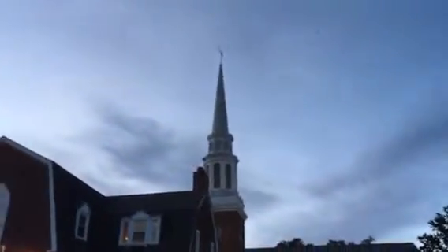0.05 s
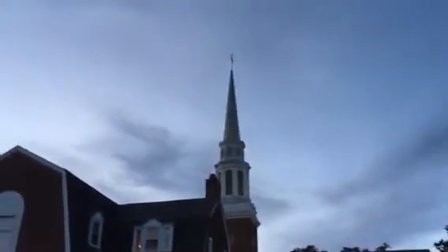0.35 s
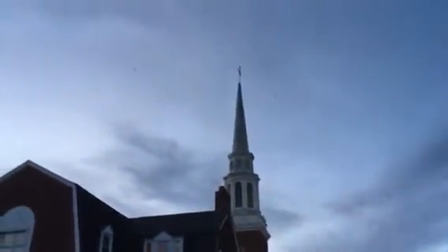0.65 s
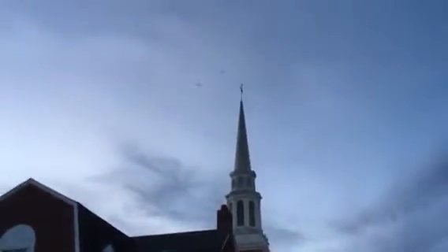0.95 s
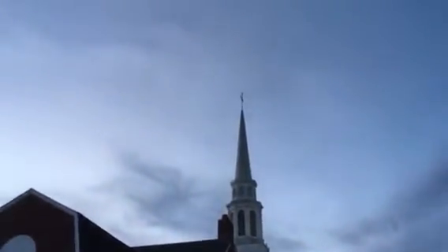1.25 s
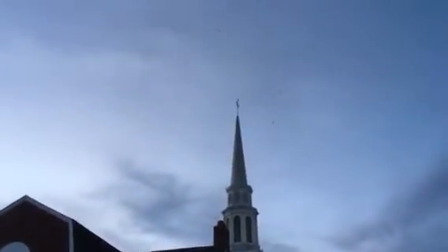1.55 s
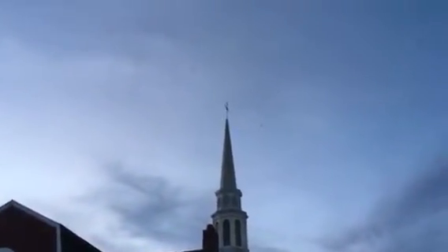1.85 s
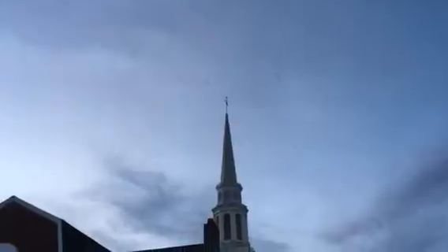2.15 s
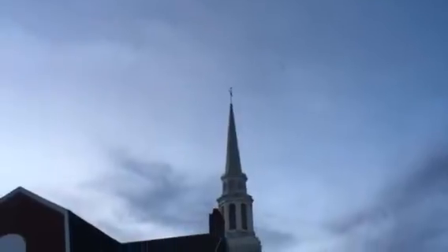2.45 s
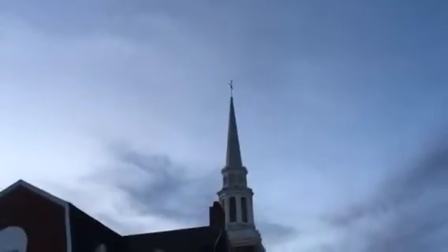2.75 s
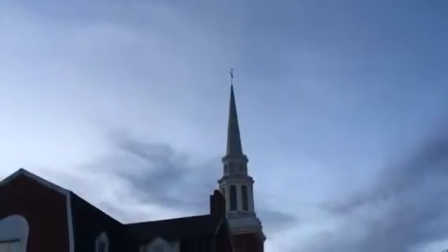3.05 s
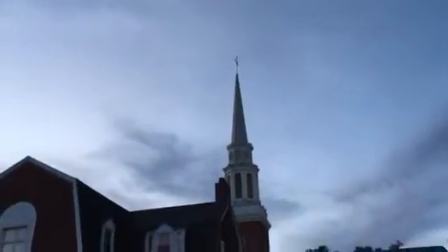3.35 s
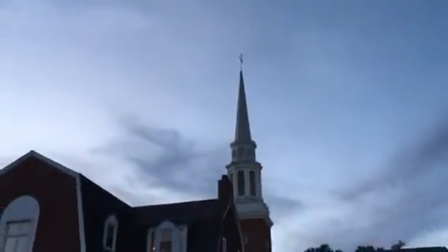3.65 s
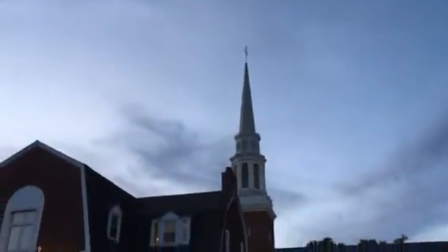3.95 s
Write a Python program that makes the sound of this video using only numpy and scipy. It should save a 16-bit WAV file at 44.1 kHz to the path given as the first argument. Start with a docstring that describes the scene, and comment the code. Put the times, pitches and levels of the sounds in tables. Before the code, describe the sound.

Small birds chip sharply in short bursts outdoors, loudest midway and then a little weaker. Underneath, distant engines drone and rumble, with faint rhythmic insect chirps and thin far trills, as a distant car gradually draws nearer.

```python
"""Swifts over a street at dusk

Swifts give runs of short, falling chips that echo off a wall. Behind them an insect chirps
in a steady rhythm of wing strokes, and thin distant trills come and go. Engines drone under
the low traffic rumble, and the tyre noise of a far car slowly swells."""
import sys
import numpy as np
from scipy import signal
from scipy.fft import rfft, irfft
from scipy.io import wavfile

SR = 44100
rng = np.random.default_rng(int(sys.argv[2]) if len(sys.argv) > 2 else 0)


def wav_record(signal):
    """Record a signal, one row per channel, as 16-bit PCM in the file named by sys.argv[1]."""
    frames = np.transpose(np.atleast_2d(signal))
    bounded = np.clip(frames, -1, 1)
    # unit amplitude maps onto the largest positive 16-bit level
    quanta = np.round(bounded * 32767).astype(np.int16)
    wavfile.write(sys.argv[1], SR, quanta)


N = 176400
T = np.arange(N) / SR


def from_db(db):
    """Decibels to gain."""
    return 10 ** (np.asarray(db) / 20)


def rms_one(x):
    """Scale to rms 1."""
    return x / np.sqrt(np.mean(x ** 2) + 1e-20)


def in_time(rows):
    """Each column after t/s, interpolated to every sample."""
    t_s, *columns = np.transpose(rows)
    return [np.interp(T, t_s, column) for column in columns]


def coloured(spectrum, low_hz=15, high_hz=20000):
    """Noise shaped by (f/Hz, level/dB) points between two band edges; rms 1."""
    hz = np.arange(N // 2 + 1) * SR / N + 1e-3
    point_hz, point_db = np.transpose(spectrum)
    shape = from_db(np.interp(np.log(hz), np.log(point_hz), point_db))
    edges = 1 / np.sqrt((1 + (low_hz / hz) ** 10) * (1 + (hz / high_hz) ** 10))
    return rms_one(irfft(rfft(rng.standard_normal(N)) * edges * shape, N))


def narrow(hz, width_hz):
    """Noise twice through one resonance; rms 1."""
    r = np.exp(-np.pi * width_hz / SR)
    section = [1 - r, 0, r - 1, 1, -2 * r * np.cos(2 * np.pi * hz / SR), r * r]
    return rms_one(signal.sosfilt([section, section], rng.standard_normal(N + SR))[SR:])


def drift(rate_hz):
    """Random wander: straight lines between unit normal draws."""
    return np.interp(T * rate_hz, np.arange(500), rng.standard_normal(500))


def swell(start_s, length_s, edge_s):
    """Rise, hold, fall; ramps centred on start and end."""
    return np.clip(np.minimum(T - start_s, start_s + length_s - T) / edge_s + .5, 0, 1)


def air():
    """Steady hiss of still air and microphone."""
    spectrum = [(1500, -4.5), (3500, 9.5), (4800, 2.5), (5800, 7), (6600, 5.5), (7400, 0.5), (9500, 1),
                (10400, -1.5), (11500, 0), (13500, -1.5), (16000, -5)]  # f/Hz, relative density/dB
    return from_db(-66.5) * coloured(spectrum, low_hz=1500)


def faint_hiss():
    """Broad band high above the tyre roar, rising at the end."""
    levels = [(0, -80), (3.5, -89), (3.9, -70), (4, -69)]  # t/s, level/dB
    return from_db(in_time(levels)[0]) * narrow(4260, width_hz=900)


def rumble():
    """Low traffic noise, gently heaving."""
    spectrum = [(20, -30), (30, -21), (42, -12), (55, -0.5), (80, 0.5), (105, 1), (140, -7.5), (200, -10),
                (300, -18), (450, -25.5), (700, -29.5), (1500, -54)]  # f/Hz, relative density/dB
    levels = [(0, -46.5), (.3, -43), (.6, -46.5), (1.2, -44.5), (1.8, -45.5), (2.4, -44), (3.0, -44.5),
              (4, -44)]  # t/s, level/dB
    return from_db(in_time(levels)[0]) * coloured(spectrum, high_hz=1480)


def engine(curve, gain_db):
    """Low exhaust note with two weak overtones, each wavering in level."""
    orders = [(1, -0.5), (2, -16.5), (3, -28.5)]  # harmonic number, relative level/dB
    waver_db = 3
    hz, db = in_time(curve)
    phase = 2 * np.pi * (np.cumsum(hz) / SR + rng.random())
    out = np.zeros(N)
    for order, order_db in orders:
        level_db = db + gain_db + order_db + waver_db * drift(rate_hz=7.68)
        out += from_db(level_db) * np.sin(order * phase)
    return np.sqrt(2) * out


def engines():
    """Three drones: near engine, far engine, approaching car."""
    # exhaust notes: t/s, f/Hz, relative level/dB
    near = [(0, 61.3, -40.5), (.58, 61.4, -47), (.75, 62.3, -38.5), (1.35, 64.03, -42), (2.05, 65.24, -44),
            (2.25, 65.94, -53), (3.2, 66, -45.5), (4, 63, -59.5)]
    far = [(0, 45.32, -50.5), (.8, 43, -43.5), (1.5, 41.07, -52), (2.8, 40.64, -46), (3.2, 40.5, -56),
           (4, 40, -58)]
    car = [(0, 156, -76), (1.7, 161, -72), (2.2, 163.7, -54), (3.0, 163.7, -52), (3.6, 165.7, -50),
           (4, 167.4, -55)]
    return engine(near, gain_db=-1) + engine(far, gain_db=-1) + engine(car, gain_db=-4.5)


def tyres():
    """Road roar, tread resonance and a brighter hiss, each with its own swell."""
    # spectra: f/Hz, relative density/dB
    roar_spectrum = [(200, -16), (400, -7.5), (620, -7), (800, -2.5), (1000, -2), (1200, -1.5), (1550, 0.5),
                     (1900, -1.5), (3000, -10)]
    hiss_spectrum = [(1300, -13), (1800, 0.5), (2200, 1), (2600, -2.5), (3000, -7), (3600, -18),
                     (4500, -23.5), (6000, -42)]
    levels = [(0, -59.5, -66.5, -70), (.65, -59.5, -65, -68.5), (1.15, -56.5, -64.5, -66),
              (1.45, -57.5, -64.5, -71), (2.15, -55, -62, -68), (2.45, -54.5, -57.5, -68),
              (2.7, -53.5, -59, -69), (2.97, -53, -59.5, -60.5), (3.45, -50.5, -60, -56.5),
              (3.7, -51, -58, -64), (4, -52.5, -56, -61.5)]  # t/s, relative levels: roar/dB, hiss/dB, tread/dB
    roar_db, hiss_db, tread_db = in_time(levels)
    roar = from_db(roar_db) * coloured(roar_spectrum, low_hz=176, high_hz=1900)
    tread = from_db(tread_db) * narrow(967, width_hz=78)
    hiss = from_db(hiss_db) * coloured(hiss_spectrum, low_hz=1600)
    return from_db(1) * (roar + tread + hiss)


def trills():
    """High, level trills, blurred by distance into narrow fluttering bands that linger."""
    calls = [(-.03, 0.099, 4500, -69), (.06, .10, 4650, -70), (0.236, .06, 6080, -70.5),
             (.745, .035, 5070, -69), (0.806, 0.14, 5230, -70), (1.277, 0.16, 4730, -71),
             (1.72, 0.38, 4570, -73.5), (2.982, .18, 4760, -75), (3.14, 0.2, 5168, -69),
             (3.431, 0.16, 5180, -75), (3.48, .28, 4550, -74)]  # t/s, length/s, f/Hz, level/dB
    tail_s = .05
    pole = np.exp(-1 / (tail_s * SR))
    out = np.zeros(N)
    for start_s, length_s, hz, db in calls:
        gate = swell(start_s, length_s, edge_s=.04)
        tail = np.sqrt(signal.lfilter([1 - pole], [1, -pole], gate ** 2 + 1e-18))
        core = narrow(hz, width_hz=150)
        blur = from_db(-4) * narrow(hz, width_hz=520)
        out += from_db(db) * np.maximum(gate, tail) * rms_one(core + blur)
    return out


def insect():
    """Chirps of about four wing strokes, each sagging in pitch, over a steady far chorus."""
    chirps = [(.315, 0.13, -67), (.79, 0.13, -67), (1.239, 0.1, -66.5), (1.596, 0.12, -66.5),
              (1.974, .135, -67.5), (2.428, 0.13, -67), (2.851, 0.12, -67.5)]  # t/s, length/s, relative level/dB
    pitch_hz, jitter_hz, sag_hz, strokes_per_s = 6435, 24.8, 110, 34
    direct, scatter_gain = np.zeros(N), np.zeros(N)
    for start_s, length_s, db in chirps:
        stroke = ((T - start_s) * strokes_per_s) % 1
        hz = pitch_hz + jitter_hz * drift(rate_hz=40) - sag_hz * (stroke - .5)
        tone = np.sin(2 * np.pi * np.cumsum(hz) / SR)
        growth = np.clip(.5 + (T - start_s) / length_s, 0, 1)
        envelope = swell(start_s, length_s, edge_s=.02) * growth * np.sin(np.pi * stroke) ** 2
        direct += 1.7 * from_db(db) * envelope * tone
        scatter_gain += from_db(db - 7) * swell(start_s, length_s, edge_s=.05)
    scatter = scatter_gain * narrow(6290, width_hz=240)
    chorus = from_db(-75.5) * narrow(6270, width_hz=280)
    return direct + scatter + chorus


def street(x):
    """Direct sound plus one wall echo and a faint scattered tail."""
    echo_s, echo_db, t60_s, tail_db = .012, -19, .32, -9.5
    echo = np.interp(T - echo_s, T, x)
    t = T[:SR // 2]
    tail = rng.standard_normal(len(t)) * from_db(-60 * t / t60_s) * (t > echo_s)
    scattered = signal.fftconvolve(x, tail / np.sqrt(np.sum(tail ** 2)))[:N]
    return x + from_db(echo_db) * echo + from_db(tail_db) * scattered


def swifts():
    """Each chip is a sine plus octave that starts sharply, then dives and fades."""
    # t/s, dive time/s, start f/Hz, share of pitch lost in the dive time, level/dB
    chips = [(0.067, 0.024, 4880, 0.14, -60), (.1315, 0.029, 5150, 0.14, -57),
             (1.1105, 0.0043, 6309, .24, -53), (1.159, 0.0069, 6352, .28, -52),
             (1.212, 0.0091, 5900, .12, -52.5), (1.26, .007, 5770, .28, -51.5),
             (1.341, 0.012, 5670, .12, -51.5), (1.407, 0.012, 5430, .12, -56),
             (1.551, 0.016, 5400, .08, -60), (1.7705, .010, 6050, .24, -57),
             (1.823, 0.0056, 6300, 0.34, -45), (1.882, 0.0097, 6230, 0.31, -48.5),
             (1.9645, .019, 5900, .30, -49), (2.042, 0.016, 5835, 0.14, -55),
             (2.21, 0.0076, 6430, 0.27, -47.5), (2.2868, .014, 6240, 0.34, -49.5),
             (2.384, .010, 5270, .12, -57), (2.445, 0.013, 5300, .2, -63), (2.961, .005, 5630, 0.33, -52),
             (3.015, .007, 5663, 0.327, -56), (3.0735, 0.011, 6000, .34, -54),
             (3.1365, .007, 6000, .34, -51.5), (3.179, .005, 5254, .24, -54), (3.224, .007, 5700, .12, -55),
             (3.3065, 0.013, 5320, 0.29, -60), (3.4475, .014, 5710, 0.43, -58),
             (3.572, .014, 5190, 0.2, -59), (3.701, 0.0064, 6160, .30, -53.5),
             (3.82, 0.02, 5870, .30, -54.5)]
    # second harmonic, weaker as the birds fly off: t/s, relative level/dB
    overtone = [(.1, -6.5), (1.2, -9), (1.9, -8.5), (2.4, -9), (3.0, -22), (3.9, -19)]
    attack_share, fade, bend, octave_top_hz = .1, 2.6, 1.4, 12300
    out = np.zeros(N + SR)
    for start_s, dive_s, start_hz, fall, db in chips:
        age = np.arange(int(1.5 * dive_s * SR)) / (dive_s * SR)  # in dive times
        hz = start_hz * (1 - fall * age ** bend)
        phase = 2 * np.pi * np.cumsum(hz) / SR
        attack = np.minimum(age / attack_share, 1)
        release = np.minimum((age[-1] - age) * 10, 1)
        envelope = attack * np.exp(-fade * age ** 1.5) * release
        octave_db = np.interp(start_s, *np.transpose(overtone))
        octave_gain = from_db(octave_db) / np.sqrt(1 + (2 * hz / octave_top_hz) ** 20)
        tone = np.sin(phase) + octave_gain * np.sin(2 * phase)
        onset = int(start_s * SR)
        out[onset:onset + len(age)] += from_db(db) * envelope * tone
    return out[:N]


def scene():
    """Birds and insects above the traffic; mono."""
    background = rumble() + engines() + faint_hiss() + air()
    wildlife = street(swifts()) + insect() + trills()
    return (background + tyres() + wildlife)[None]


def record(dry):
    """Steep elliptic low-pass."""
    cutoff_hz = 15750
    return signal.sosfilt(signal.ellip(12, .1, 80, cutoff_hz, fs=SR, output="sos"), dry)


dry = scene()
out = record(dry)
wav_record(out)
```